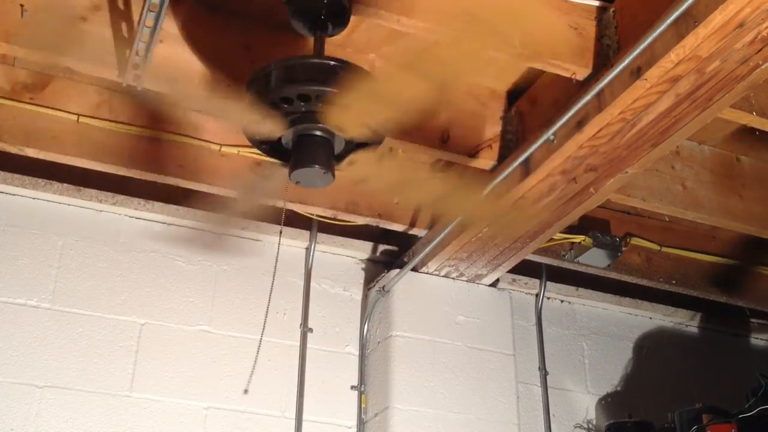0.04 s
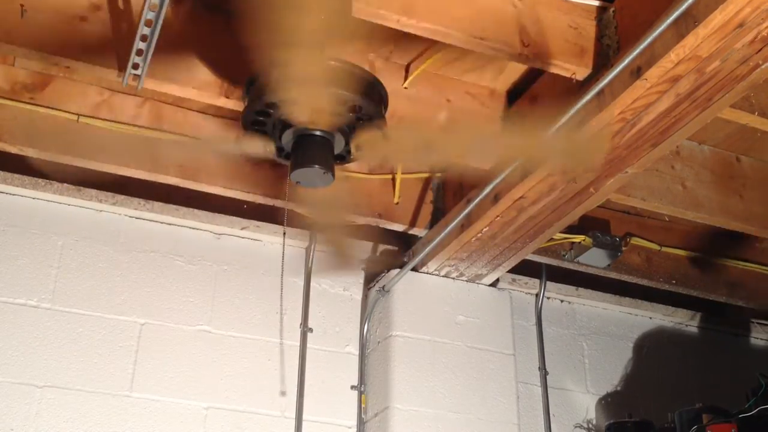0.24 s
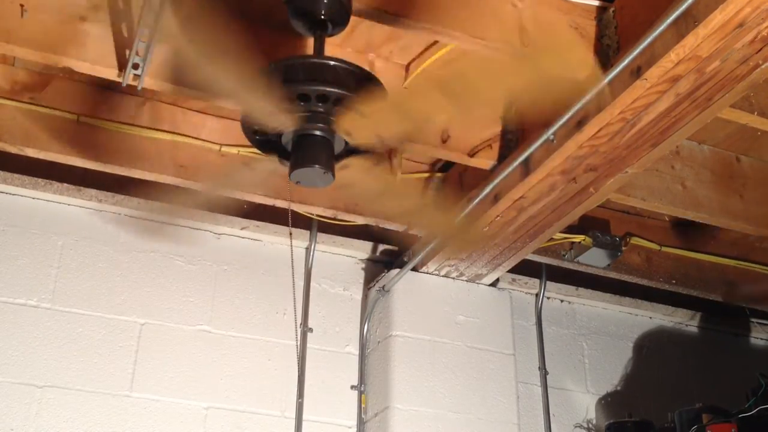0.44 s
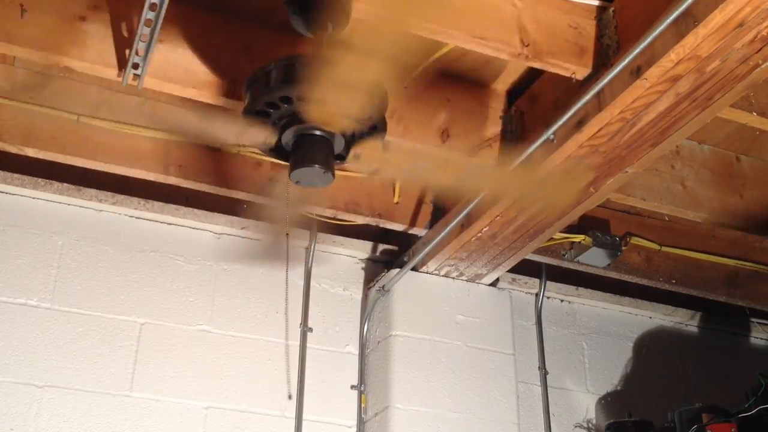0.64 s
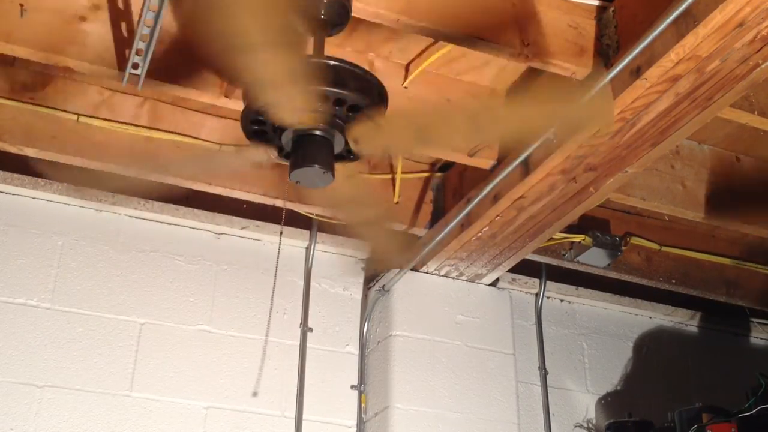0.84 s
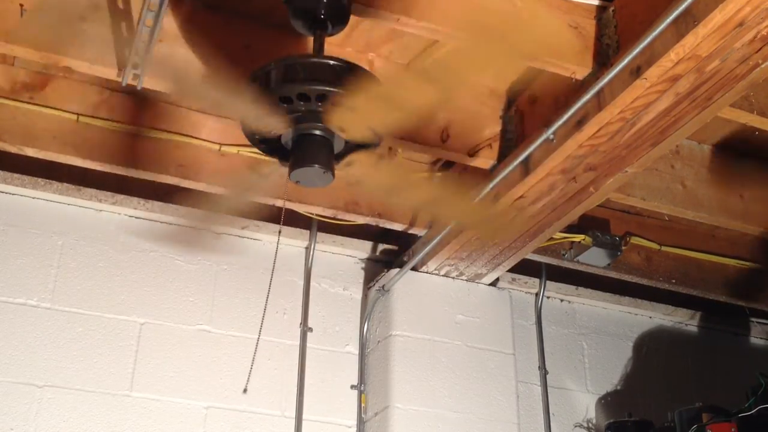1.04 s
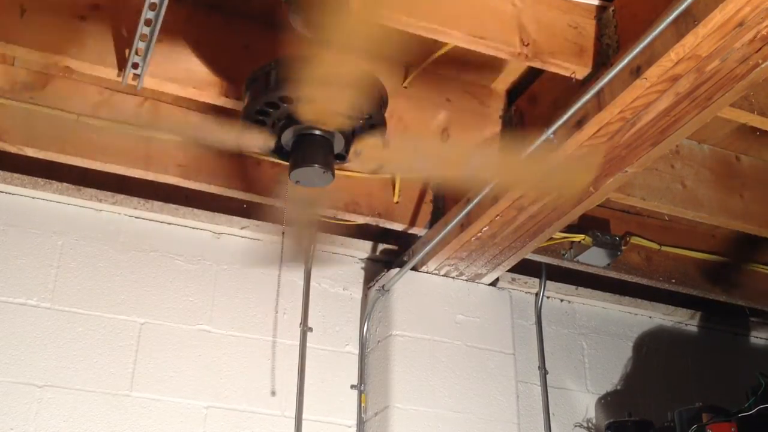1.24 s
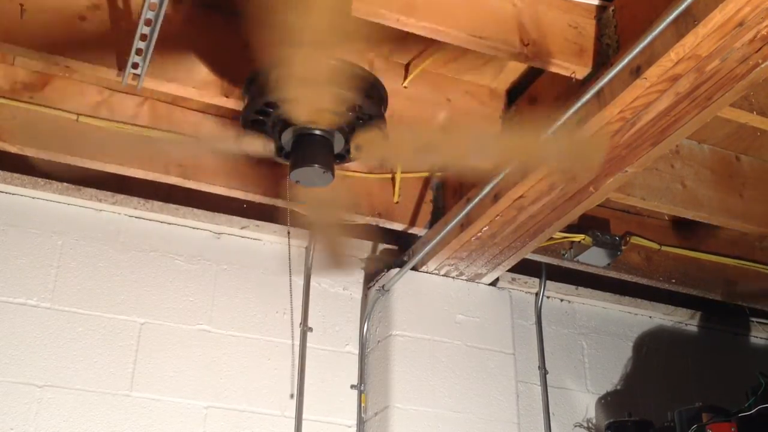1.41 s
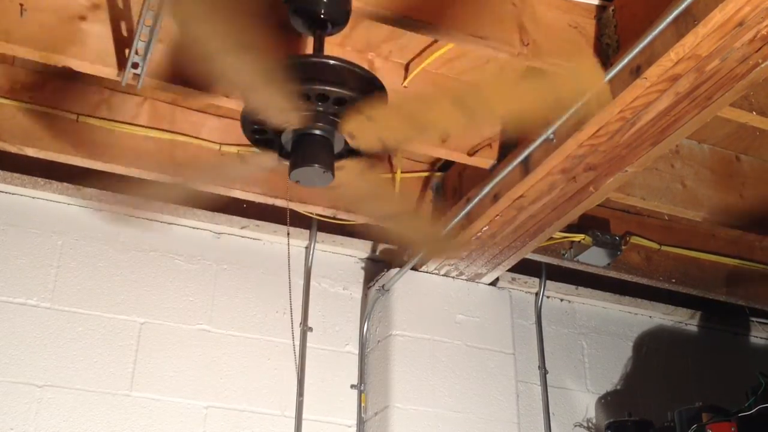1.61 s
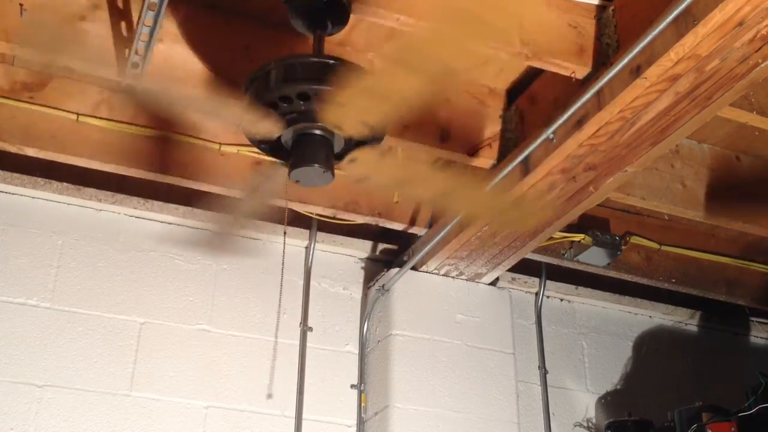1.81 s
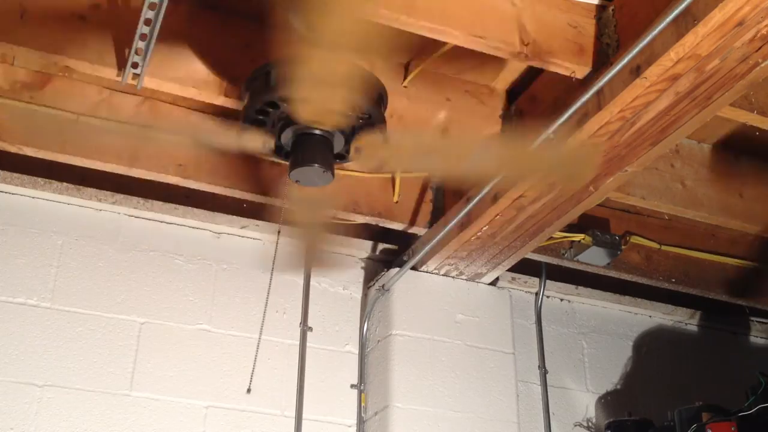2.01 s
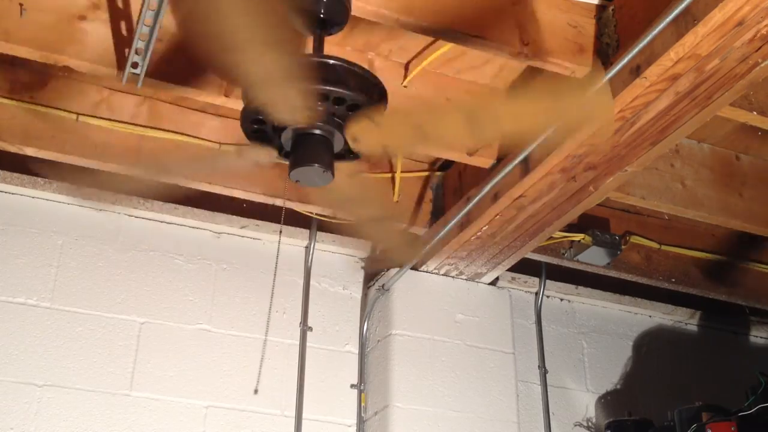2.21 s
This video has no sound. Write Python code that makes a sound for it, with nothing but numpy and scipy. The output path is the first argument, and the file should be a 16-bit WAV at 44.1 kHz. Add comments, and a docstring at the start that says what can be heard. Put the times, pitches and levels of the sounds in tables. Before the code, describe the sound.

A few footfalls thump and ring briefly in a block-walled basement, heard from a distance. Soft scuffs and fainter knocks fall between them, over the quiet air and motor hum of a ceiling fan that briefly whines at the end.

```python
"""A bare block-walled basement, one microphone, far enough off to hear more room than direct sound.
From the start a ceiling fan stirs the air over a faint motor hum, and a soft scuff dies away.
At 0.2 s comes a low, woody knock, probably a heel-and-toe footfall, ringing briefly in the room.
More land near 1 s and 1.7 s, with fainter knocks and the friction of scuffs and rustles between.
Near 2 s, under the last rustles, the motor's whine swells and settles."""
import sys
import numpy as np
from scipy import signal
from scipy.fft import rfft, irfft, next_fast_len
from scipy.io import wavfile
from scipy.ndimage import uniform_filter1d

SR = 44100
rng = np.random.default_rng(int(sys.argv[2]) if len(sys.argv) > 2 else 0)


def pcm_store(signal):
    """Save signal as 16-bit PCM."""
    levels = np.round(np.clip(np.atleast_2d(signal), -1, 1) * 32767)
    wavfile.write(sys.argv[1], SR, levels.astype(np.int16).T)


N = 103635
T = np.arange(N) / SR
FFT_SIZE = 2 * next_fast_len(N)
FREQS = np.maximum(np.arange(FFT_SIZE // 2 + 1) * SR / FFT_SIZE, 1)

# moving air and background hiss: freq_hz, gain_db
AIR_COLOUR = [(25, -70), (60, -79.5), (95, -69), (130, -52), (220, -53.5), (350, -56.5), (700, -58.5),
              (1000, -58), (1200, -59.5), (1500, -61.5), (2100, -63.5), (3000, -69), (4500, -70.5),
              (7500, -71), (10500, -77), (15000, -72.5)]
# the motor's partials, before waver and swell: pitch_hz, level_db
HUM_PARTIALS = [(120, -81), (240, -81), (480, -83), (600, -86.5), (962, -86), (1078, -87.5), (1140, -79.5),
                (1200, -81), (1260, -86.5), (1440, -87), (2019, -90)]
# swell of the motor's upper partials: time_s, gain_db
WHINE_SWELL = [(0, -1), (.9, -0.5), (1.6, 2), (2.0, 7.5), (2.35, -1)]

# scuffs and rustles, one gain per scuff band: peak_s, rise_s, decay_s, low_db, rub_db, hiss_db, air_db
SCUFF_STROKES = [(.01, 0.034, 0.13, -63, -63.5, -65.5, -63.5), (.51, 0.055, 0.068, -58.5, -66, -64.5, -66),
                 (.582, 0.018, 0.072, -49.5, -49.5, -53, -56.5),
                 (1.005, 0.016, 0.066, -43, -47.5, -47.5, -45.5), (1.29, 0.049, 0.23, -62, -59, -56.5, -60),
                 (1.411, .03, 0.034, -48.5, -74, -55.5, -55), (1.714, 0.034, 0.048, -47, -57, -51.5, -64),
                 (1.86, 0.09, 0.062, -56, -54.5, -61.5, -64), (1.98, 0.058, 0.055, -55.5, -62.5, -76, -84)]
SCUFF_BANDS_HZ = [500, 2000, 6500, 12000]
# colour shared by all rubbing: freq_hz, gain_db
RUB_COLOUR = [(80, -18), (300, 2.5), (700, -2), (1300, 2.5), (2100, 7.5), (2550, -5), (3300, -7),
              (4000, -11.5), (5000, -6), (8000, -1), (10000, -8), (15000, -12)]
# resonances that rubbing brings out: centre_hz, width_hz, gain_db
RUB_RESONANCES = [(1275, 98, 8), (2030, 170, 0.5), (2383, 44, 7.5), (2827, 170, 12)]

# blows, with a gain for room tail and wood ring, then one gain per knock band:
# start_s, ring_db, thump_db, body_db, knock_db, clack_db, rap_db, treble_db
KNOCK_BLOWS = [(0.2021, 0, 8, 12, 9, -0.5, 12.5, 11), (.2052, -2, 15, 17, 16.5, 11.5, 14, 7),
               (.549, 1, -21, -21, -20.5, -13, -15.5, -13), (0.9766, 2, 1, 2, -6, 0.5, -9.5, 2.5),
               (1.0589, 2.5, 0, 1, 7.5, 9, -6, -5.5), (1.103, 1.5, -14, -11, -8, -5.5, -6.5, -6.5),
               (1.390, 1, -25.5, -24.5, -14, -14, -16.5, -16), (1.6727, 1.5, 2, -1, 8, 12, 4.5, -6),
               (1.749, -0.5, 0, 1, 0.5, -2, -4, -10.5)]
KNOCK_BANDS_HZ = [260, 650, 920, 1250, 2100, 5000]
# colour shared by all knocks: freq_hz, gain_db
BLOW_COLOUR = [(25, -53), (55, -41), (90, -21.5), (135, -5.5), (190, -3), (260, -3.5), (400, 1), (500, -5),
               (610, -2.5), (760, -3.5), (1250, -1.5), (1450, -3.5), (1650, -3.5), (2180, -2), (2430, -8),
               (2630, -13), (2850, -9.5), (3150, -19), (4000, -22.5), (7300, -24.5), (10000, -34.5),
               (15000, -48)]
# modes of the struck wood, the short thud first: pitch_hz, gain_db, t60_s
WOOD_MODES = [(311, -1.5, 0.018), (731, -2, 0.025), (1200, -9.5, 0.026), (2013, -3, 0.014),
              (259.3, 3, 0.48), (386.7, 1.5, 0.33), (605, -7, 0.3), (630, -16, 0.34), (705, -1.5, 0.11),
              (878, 2, 0.15), (1007, 1.5, 0.22), (1270, -2.5, 0.55), (1377, -0.5, 0.53), (1680, 3, 0.25),
              (2010, 9, 0.4), (2165, -4, 0.48), (2190, -1, .4), (2379, -1, 0.83)]
# the basement's decay: freq_hz, t60_s
BASEMENT_DECAY = [(120, 0.33), (300, 0.38), (700, 0.36), (1300, 0.46), (2200, 0.46), (5000, 0.35),
                  (12000, 0.39)]


def from_db(db):
    """Decibels to gain."""
    return 10 ** (np.asarray(db) / 20)


def at_hz(points, hz):
    """Read a table on a log-frequency axis."""
    freqs, values = np.transpose(points)
    return np.interp(np.log(hz), np.log(freqs), values)


def colour(x, curve_db):
    """Causal (minimum-phase) filter with the given gain at each frequency."""
    cepstrum = irfft(np.log(from_db(curve_db)))
    cepstrum[1:FFT_SIZE // 2] *= 2
    cepstrum[FFT_SIZE // 2 + 1:] = 0
    return irfft(rfft(x, FFT_SIZE) * np.exp(rfft(cepstrum)))[:N]


def drift(rate_hz):
    """Smooth random motion of spread 1."""
    slow = irfft(rfft(rng.standard_normal(FFT_SIZE)) / (1 + (FREQS / rate_hz) ** 2))[:N]
    return slow / slow.std()


def unit_energy(x):
    """Scale to a total energy of 1."""
    return x / np.sqrt(np.sum(x ** 2) + 1e-20)


def fan_air(blades_per_s=10, swish_db=0.8):
    """Air moving overhead swells slightly with each passing blade."""
    air = colour(rng.standard_normal(N), at_hz(AIR_COLOUR, FREQS))
    swish = np.sin(2 * np.pi * (blades_per_s * T + rng.random()))
    return air * from_db(swish_db * swish)


def motor_hum(waver_db=2, whine_above_hz=400):
    """The fan motor's mains harmonics each waver; the upper ones swell together into a whine."""
    swell_db = np.interp(T, *np.transpose(WHINE_SWELL))
    hum = np.zeros(N)
    for hz, level_db in HUM_PARTIALS:
        rms = from_db(level_db + waver_db * drift(rate_hz=7.2) + swell_db * (hz > whine_above_hz))
        hum += rms * np.sqrt(2) * np.sin(2 * np.pi * (hz * T + rng.random()))
    return hum


def scuffs(grain_db=1.5):
    """Grainy friction excites a few resonances; each stroke swells and dies away."""
    peaks_db = sum(db / (1 + (2 * (FREQS - hz) / width) ** 2) for hz, width, db in RUB_RESONANCES)
    shared_db = at_hz(RUB_COLOUR, FREQS) + peaks_db
    grain = from_db(grain_db * drift(rate_hz=104))
    out = np.zeros(N)
    for peak_s, rise_s, decay_s, *bands_db in SCUFF_STROKES:
        t = T - peak_s
        stroke = np.exp(-np.where(t < 0, 0.5 * (t / rise_s) ** 2, t / decay_s))
        friction = stroke * grain * rng.standard_normal(N)
        stroke_db = at_hz(list(zip(SCUFF_BANDS_HZ, bands_db)), FREQS)
        out += colour(friction, shared_db + stroke_db)
    return out


def room_tail(t):
    """One second of reverberation between bare walls: noise that dies band by band."""
    white, hz = rfft(rng.standard_normal(SR)), np.arange(SR // 2 + 1)
    centres_hz = np.geomspace(100, 14000, 12)
    tail = np.zeros(SR)
    for centre_hz, share in zip(centres_hz, np.eye(len(centres_hz))):
        band = irfft(white * np.interp(hz, centres_hz, share), SR)
        tail += band * from_db(-60 * t / at_hz(BASEMENT_DECAY, centre_hz))
    return tail


def click_at_mic(ring_db, contact_hz=2640, echoes_per_s=1800, early_t60_s=0.13, build_s=0.0045):
    """A click, rounded by soft contact, reaches the microphone direct, then as echoes and a tail."""
    t = T[:SR]
    direct = signal.sosfilt(signal.butter(2, contact_hz, fs=SR, output="sos"), (t == 0) + 1e-18)
    echo_age_s = np.maximum(t - 0.0017, 0)  # echoes begin 1.7 ms behind the direct sound
    echoes = (rng.random(SR) < echoes_per_s / SR) * rng.standard_normal(SR)
    early = unit_energy(echoes * (echo_age_s > 0) * from_db(-60 * t / early_t60_s))
    tail = unit_energy(room_tail(t) * (1 - np.exp(-echo_age_s / build_s)))
    click = from_db(-7) * direct + from_db(-4.5) * early + from_db(ring_db - 2) * tail
    # even out the overall colour, keeping ripples finer than 140 Hz
    power = uniform_filter1d(np.abs(rfft(click, FFT_SIZE)) ** 2, size=int(140 * FFT_SIZE / SR))
    return colour(click, -10 * np.log10(power))[:SR]


def wood_ring():
    """Struck wood rings in damped modes, each starting at a phase of its own."""
    t, ring = T[:SR], np.zeros(SR)
    for hz, gain_db, t60_s in WOOD_MODES:
        damping = np.log(1000) / t60_s
        amplitude = from_db(gain_db) * 2 * damping / SR  # puts the resonance's peak at gain_db
        ring += amplitude * np.exp(-damping * t) * np.sin(2 * np.pi * (hz * t + rng.random()))
    return ring


def knocks():
    """Each blow sets wood and room ringing, in a colour that depends on how it lands."""
    shared_db = at_hz(BLOW_COLOUR, FREQS)
    out = np.zeros(N)
    for start_s, ring_db, *bands_db in KNOCK_BLOWS:
        blow = click_at_mic(ring_db) + from_db(ring_db) * wood_ring()
        placed = np.pad(blow, (int(start_s * SR), 0))[:N]
        landing_db = at_hz(list(zip(KNOCK_BANDS_HZ, bands_db)), FREQS)
        out += colour(placed, shared_db + landing_db)
    return out


def scene():
    """The fan, scuffs and knocks meet at one microphone."""
    return (fan_air() + motor_hum() + scuffs() + knocks())[None]


def record(dry):
    """The recorder cuts the top steeply above 15.4 kHz."""
    return signal.sosfilt(signal.ellip(12, 0.1, 70, 15400, fs=SR, output="sos"), dry)


dry = scene()
out = record(dry)
pcm_store(out)
```